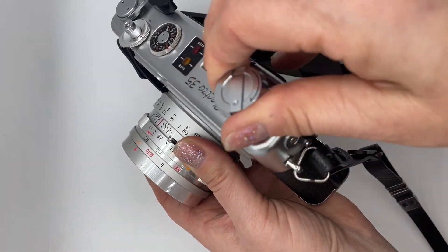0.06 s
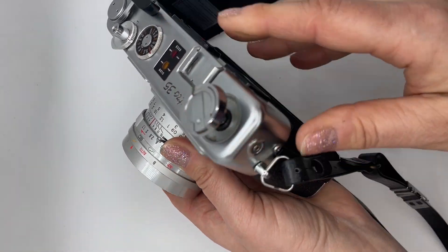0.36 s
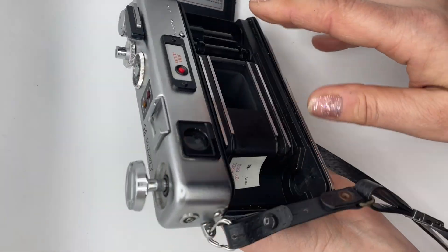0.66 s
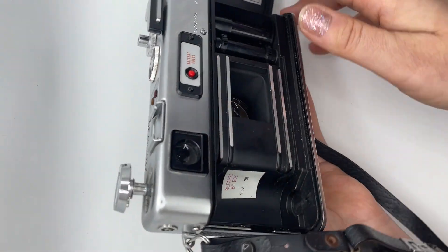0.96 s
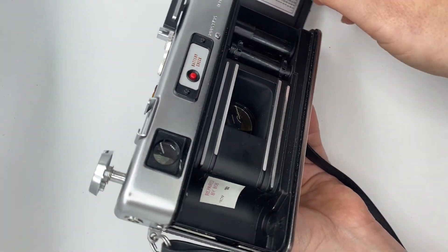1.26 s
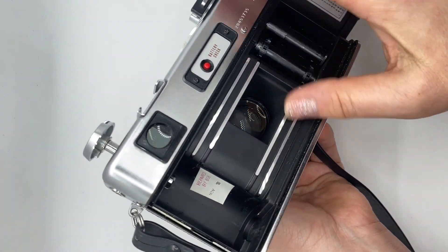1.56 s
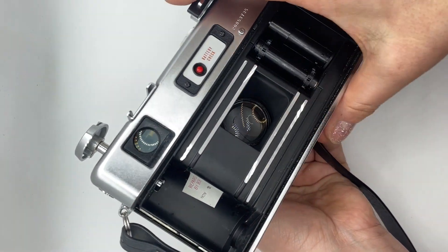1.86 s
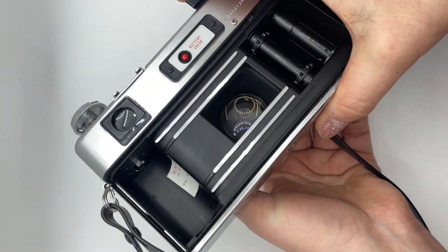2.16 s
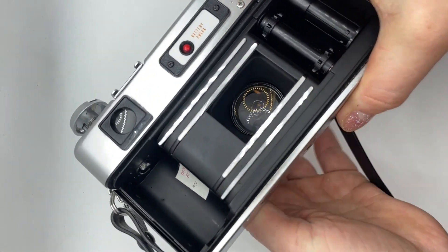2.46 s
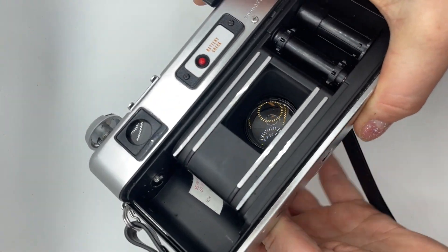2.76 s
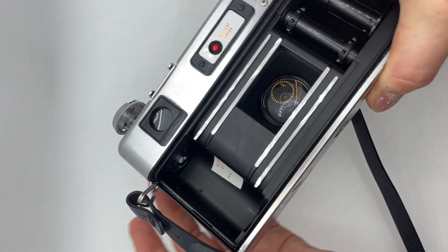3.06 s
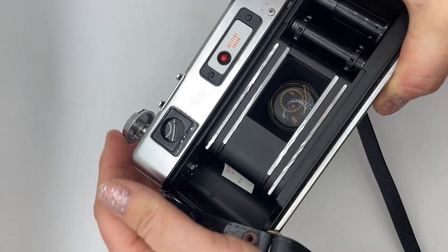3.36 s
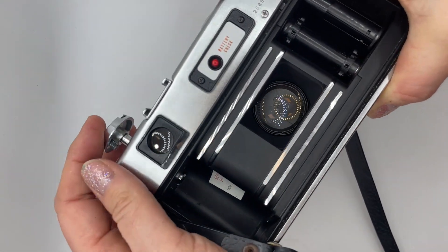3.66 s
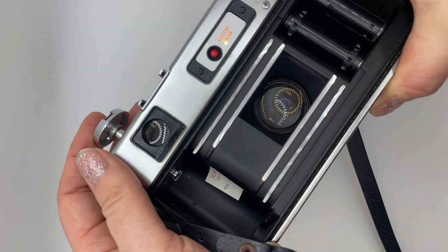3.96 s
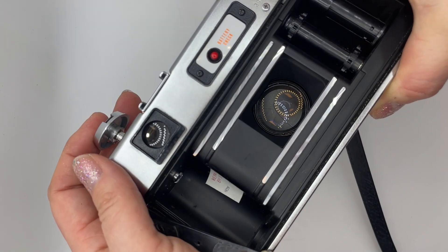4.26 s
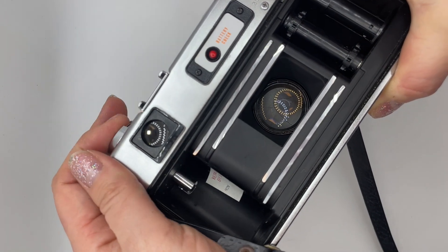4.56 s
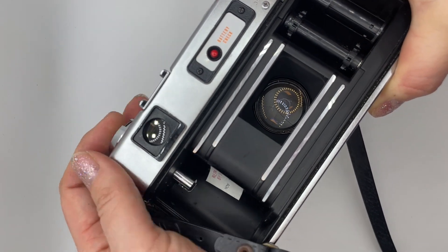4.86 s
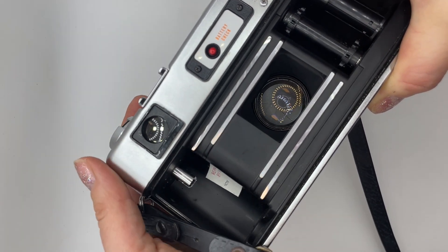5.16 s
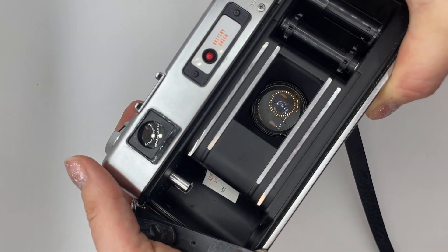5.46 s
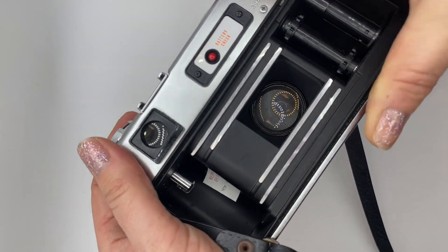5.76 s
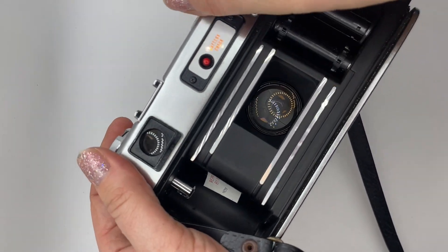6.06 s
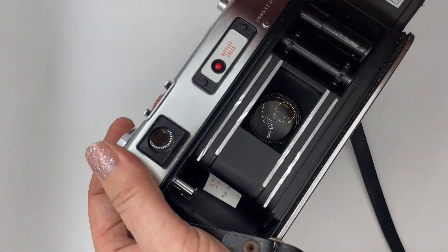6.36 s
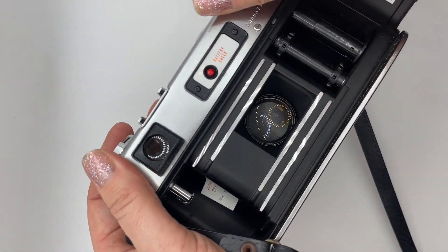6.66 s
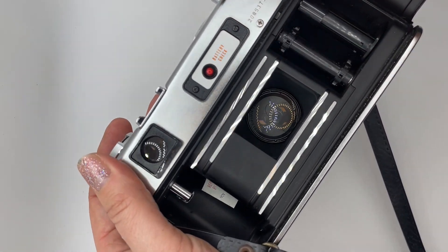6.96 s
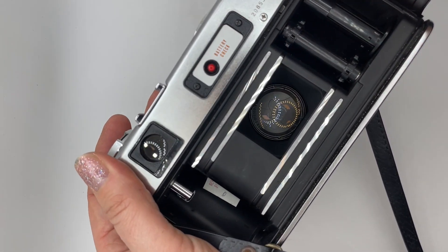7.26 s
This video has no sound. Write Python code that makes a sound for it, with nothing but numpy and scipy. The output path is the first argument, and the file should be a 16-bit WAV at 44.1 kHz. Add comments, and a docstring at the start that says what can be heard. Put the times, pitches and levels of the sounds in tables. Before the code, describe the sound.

Close clicks, knocks and soft finger rubbing as a metal film camera is handled and its back door springs open.

```python
"""Handling a metal film camera

In a small quiet room, close up and in stereo, the rewind knob is pulled up, the back door springs
open with a knock and a ringing spring, and the knob is snapped home. Each hit rings the thin shell
and hollow body, and the big ones thud in the hand. Fingers rub over the shell, the strap's ring
and buckle tick and jingle against it, and near the end the stiff hinge scrapes."""
import sys
import numpy as np
from scipy import signal
from scipy.fft import rfft, irfft, next_fast_len
from scipy.io import wavfile
from scipy.ndimage import map_coordinates

SR = 44100
rng = np.random.default_rng(int(sys.argv[2]) if len(sys.argv) > 2 else 0)


def dump(signal):
    """Clip the signal to [-1, 1] and save it as 16-bit WAV at the path in sys.argv[1]."""
    limited = np.clip(np.atleast_2d(signal).T, -1, 1)
    pcm = np.round(limited * 32767).astype(np.int16)
    wavfile.write(sys.argv[1], SR, pcm)


N = 326340
TIME = np.arange(N) / SR  # seconds since the start
AGE = np.arange(SR // 4) / SR  # seconds since a hit


def amp(db):
    """Turn decibels into a gain."""
    return 10 ** (np.asarray(db) / 20)


def unit(x):
    """Scale x to an average (rms) level of 1."""
    return x / np.sqrt(np.mean(x ** 2) + 1e-20)


def unit_hit(x):
    """Give x as much energy as ten milliseconds at level 1."""
    return x * np.sqrt(.01 * SR / (np.sum(x ** 2) + 1e-20))


def fade(ring_s):
    """Die away by 60 dB in ring_s seconds, the ring time."""
    return np.exp(-np.log(1000) * AGE / ring_s)


def along(points, hz):
    """Read a (frequency, value) table between its rows, on a log scale."""
    freqs, values = np.transpose(points)
    return np.interp(np.log(hz + 1), np.log(freqs + 1), values)


def curve(points):
    """Join (time, value) points into one value per sample."""
    return np.interp(TIME, *np.transpose(points))


def add(track, s, x):
    """Mix x into the track, starting at s seconds."""
    start = max(0, round(s * SR))
    track[start:start + len(x)] += x[:max(0, len(track) - start)]


def wobble(rate):
    """A smooth curve through `rate` random values a second."""
    return map_coordinates(rng.standard_normal(int(N * rate / SR) + 4), [TIME * rate])


def filtered(x, response):
    """Change the strength and phase of each frequency in x by response(hz)."""
    size = next_fast_len(N + SR // 2)
    return irfft(rfft(x, size) * response(np.fft.rfftfreq(size, 1 / SR)), size)[..., :N]


def resonate(x, modes):
    """Pass x through modes, the pitches at which a thing likes to ring; the result has level 1."""
    def response(f):
        return sum(amp(db) * 1j * f * width / (hz * hz - f * f + 1j * f * width)
                   for hz, width, db in modes)
    return unit(filtered(x, response))


def ring(modes, scatter_db, detune):
    """Struck metal rings in fading tones, a little different in strength and pitch each time."""
    chance = rng.standard_normal((len(modes), 3))
    tones = np.zeros(len(AGE))
    for (hz, db, ring_s), (louder, sharper, phase) in zip(modes, chance):
        cycles = hz * (1 + detune * sharper) * AGE + phase
        tones += amp(db + scatter_db * louder) * fade(ring_s) * np.sin(2 * np.pi * cycles)
    return unit_hit(tones * (1 - np.exp(-AGE / .0036)))


def chatter(click, hold_s, ring_s, tail_db, tail_s, rise_s=.0001):
    """Metal parts rattle in tiny uneven clicks for a moment, then die away with a faint tail."""
    burst = np.minimum(1, np.exp(-np.log(1000) * (AGE - hold_s) / ring_s))
    loudness = (1 - np.exp(-AGE / rise_s)) * (burst + amp(tail_db) * fade(tail_s))
    impacts = rng.standard_normal(len(AGE)) * amp(1.4 * rng.standard_normal(len(AGE)))
    return unit_hit(signal.fftconvolve(loudness * impacts, click)[:len(AGE)])


# The shell's broad resonances: (frequency [Hz], width [Hz], boost [dB])
SHELL_PEAKS = [(620, 250, 6.5), (890, 120, 4.5), (1120, 81, 2), (1750, 150, 3), (2100, 540, 5),
               (3430, 200, 2.5), (3860, 130, 1.5), (4900, 200, 0), (6540, 370, 3.5), (15500, 590, 6.5)]


def shell_db(hz):
    """How much the thin shell boosts each frequency."""
    return sum(db / (1 + (2 * (hz - centre) / width) ** 2) for centre, width, db in SHELL_PEAKS)


def shell_click(colour, size=4096):
    """One click of the given tone colour, heard through the shell."""
    hz = np.fft.rfftfreq(size, 1 / SR)
    cepstrum = irfft(np.log(amp(along(colour, hz) + shell_db(hz))))
    # Folding the second half onto the first packs the energy at the start (minimum phase).
    cepstrum[1:size // 2] *= 2
    cepstrum[size // 2 + 1:] = 0
    return irfft(np.exp(rfft(cepstrum)))


def through_shell(x, shifts_per_s=12, ring_s=.05):
    """Rubbing stirs the shell's many weak modes, which change as the finger moves."""
    hop = int(SR / shifts_per_s)
    window = signal.windows.cosine(2 * hop)
    padded = np.pad(x, (hop, 2 * hop))
    out = np.zeros(len(padded))
    for start in range(0, len(x) + hop, hop):
        answer = unit(rng.standard_normal(len(AGE)) * fade(ring_s)) / np.sqrt(len(AGE))
        answer[0] += 1  # the rubbing itself
        add(out, start / SR, signal.fftconvolve(window * padded[start:start + 2 * hop], answer))
    return out[hop:hop + len(x)] / np.sqrt(2)


# How alike left and right are in the room: (frequency [Hz], likeness [0 to 1])
STEREO_LIKENESS = [(100, 0.99), (290, 0.93), (640, 0.13), (3000, 0.068), (7000, 0.0067)]


def from_all_sides(pair):
    """Blend two unrelated signals so that left and right are alike only in the bass."""
    def shares(hz):
        angle = np.arccos(along(STEREO_LIKENESS, hz)) / 2
        return np.array([np.cos(angle), np.sin(angle)])
    mid, side = filtered(pair, shares)
    return np.array([mid + side, mid - side])


# The tones of springy steel: (frequency [Hz], level [dB], ring time [s])
STEEL_MODES = [(3700, -8, .035), (3914, -2.5, .04), (4210, 0, .06), (4420, -5, .03), (4740, -5, .03),
               (5100, -5, .03), (5400, -3, .04), (6510, 2, .04), (6640, -1, .045), (7030, -6, .04),
               (8870, -7, .05), (12760, -10, .05), (14140, -8, .05), (15570, -11, .05)]
# The bright edge of metal touching metal: (frequency [Hz], level [dB])
SPARKLE_COLOUR = [(2000, -32.5), (3500, -6), (5500, -3.5), (8000, -2), (9200, 3.5), (11500, -9),
                  (15300, -6.5), (16500, -18.5)]
# Hits on the springs and the strap ring: (time [s], level [dB])
JINGLE_HITS = [(0, -40), (0.6165, -25.5), (.635, -30), (.653, -37.5), (.672, -40), (.697, -46.5),
               (.722, -61), (1.003, -53), (1.165, -51.5), (1.551, -49), (1.595, -58.5), (1.66, -61),
               (1.72, -64.5), (1.9935, -58), (5.797, -51.5), (6.1, -75.5), (6.14, -74), (6.288, -55.5),
               (6.308, -58), (6.989, -69.5)]


def jingles(flight_s=.0082, bounce_loss_db=5.5, touches_per_s=260):
    """Steel hits its seat, rattles and bounces once; light hits ring shorter and less in tune."""
    out = np.zeros(N)
    sparkle = shell_click(SPARKLE_COLOUR)
    flights = flight_s * rng.uniform(.7, 1.2, len(JINGLE_HITS))
    for (hit_s, hit_db), flight in zip(JINGLE_HITS, flights):
        for s, db in [(hit_s, hit_db), (hit_s + flight, hit_db - bounce_loss_db)]:
            lightness = np.clip((-25 - db) / 25, 0, 1)
            touching = rng.random(len(AGE)) < touches_per_s / SR
            touches = touching * rng.standard_normal(len(AGE)) * fade(.03)
            touches[0] = 1.6  # the first strike
            modes = [(hz, level, ring_s * (1 - .3 * lightness)) for hz, level, ring_s in STEEL_MODES]
            tones = ring(modes, scatter_db=3 + 2 * lightness, detune=.014 + .016 * lightness)
            steel = unit_hit(signal.fftconvolve(touches, tones)[:len(AGE)])
            scrape = chatter(sparkle, hold_s=.002, ring_s=.03, tail_db=-26, tail_s=.1)
            add(out, s, amp(db) * (amp(-2.5) * steel + amp(-4.5) * scrape))
    return out


# The dull rub and the bright hiss of sliding, each: (frequency [Hz], level [dB])
RUB_COLOUR = [(250, -19), (450, -3.5), (620, -3.5), (780, -8), (920, 1.5), (1200, -5), (1500, -2.5),
              (2200, -5.5), (3200, -13), (6000, -38)]
HISS_COLOUR = [(1200, -27), (2500, -1), (4200, 4), (6000, 1.5), (7200, -0.5), (9000, -3), (11500, -15),
               (15300, -7), (16500, -26)]
# The hollow film chamber's resonances: (frequency [Hz], width [Hz], level [dB])
CHAMBER_MODES = [(647, 81, -6), (915, 44, -1.5), (1144, 61, 1), (1360, 37, -5), (1760, 90, -12),
                 (3035, 110, -12.5), (4150, 100, -17.5)]
# How strongly skin and strap slide: (time [s], level [dB])
SLIDE_LEVELS = [(0.0, -58.5), (0.25, -71), (0.39, -67.5), (0.5, -85.5), (0.68, -87), (0.76, -72.5),
                (1.0, -74.5), (1.06, -77), (1.12, -68.5), (1.52, -70), (1.7, -73.5), (1.8, -85.5),
                (2.0, -74), (2.43, -86), (2.82, -92.5), (3.05, -75), (3.42, -74), (3.85, -77.5),
                (3.98, -90), (4.3, -91), (4.74, -81.5), (4.95, -72), (5.12, -82.5), (5.4, -85.5),
                (5.83, -81.5), (7.05, -93), (7.4, -93.5)]


def sliding(snags_per_s=8):
    """Skin and strap stick and slip in fine grains, snag now and then, and stir the film chamber."""
    slide_db = curve(SLIDE_LEVELS)
    rub_db = -60.5 + .93 * (slide_db + 63)  # the rub swells a little less than the hiss
    pressure = wobble(23)
    snag_starts = (rng.random(N) < snags_per_s / SR) * rng.uniform(.72, 1, N)
    snags = np.abs(signal.fftconvolve(snag_starts, fade(.087))[:N])

    def friction(colour, grain_db, snag_db):
        slips = rng.standard_normal(N) * (amp(grain_db * wobble(540)) + amp(snag_db) * snags)
        return unit(filtered(through_shell(slips), lambda hz: amp(along(colour, hz) + shell_db(hz))))

    rub = amp(rub_db - 2 + 1.6 * pressure) * friction(RUB_COLOUR, grain_db=1.5, snag_db=6.5)
    hiss = amp(slide_db + .5 + 1.4 * pressure) * friction(HISS_COLOUR, grain_db=2.2, snag_db=6)
    chamber = amp(rub_db - 6.5 + 3 * wobble(14)) * resonate(rng.standard_normal(N), CHAMBER_MODES)
    return rub + chamber + hiss


# The deep tone of moving hands and arms: (frequency [Hz], level [dB])
RUMBLE_COLOUR = [(15, -43), (25, -13), (75, 1.5), (145, -3.5), (171, 4), (200, -6), (236, 2.5),
                 (264, -10.5), (339, -16.5), (442, -12), (501, -15.5), (617, -17), (700, -21.5), (910, -46),
                 (1540, -120)]
# How strongly the grip shifts: (time [s], level [dB])
GRIP_LEVELS = [(0.0, -56.5), (0.47, -57.5), (1.15, -56), (1.87, -60.5), (3.26, -56), (4.7, -61),
               (4.86, -62), (5.05, -71.5), (5.5, -68), (5.8, -69), (6.45, -66), (7.4, -73)]


def grip_rumble():
    """The shifting grip and moving arms make a low rumble, nearly the same left and right."""
    pair = filtered(rng.standard_normal((2, N)), lambda hz: amp(along(RUMBLE_COLOUR, hz)))
    return amp(curve(GRIP_LEVELS) + 1) * unit(from_all_sides(pair))


# The quiet room's background: (frequency [Hz], level [dB])
AIR_COLOUR = [(30, -8.5), (90, -5.5), (130, -2), (175, 6.5), (250, 1), (400, -1.5), (650, -4),
              (1100, -2.5), (2000, -17.5), (2600, -24), (8000, -33.5), (16000, -40.5)]


def room_air():
    """The room's own faint, steady noise comes from all around."""
    pair = filtered(rng.standard_normal((2, N)), lambda hz: amp(along(AIR_COLOUR, hz)))
    return amp(-72) * unit(from_all_sides(pair))


# Single strokes of a finger:
# (middle time [s], half length [s], level [dB], brightness [Hz], chamber level beside the stroke [dB])
FINGER_STROKES = [(0.017, 0.037, -56.5, 5170, -5), (0.324, 0.019, -61, 2080, 6),
                  (0.516, 0.012, -55.5, 490, -23.5), (0.767, 0.052, -63.5, 3640, 7),
                  (0.913, 0.056, -65.5, 3520, 3.5), (0.978, 0.021, -54.5, 3900, -3.5),
                  (1.117, 0.025, -55.5, 3700, -0.5), (1.161, 0.016, -50.5, 3870, -14),
                  (1.241, 0.021, -60, 4440, -14.5), (1.308, 0.029, -68, 960, -4),
                  (1.442, 0.058, -72, 3800, -4), (1.614, 0.097, -72, 5390, -17),
                  (1.825, 0.013, -78, 5000, -12), (2.329, 0.0076, -66, 6200, -13),
                  (2.37, 0.026, -73.5, 6040, -16), (2.423, 0.0022, -59.5, 3980, -16),
                  (2.491, 0.037, -62, 10700, -6.5), (2.609, 0.049, -70.5, 1603, 6),
                  (2.907, 0.037, -70.5, 2150, 11), (3.176, 0.036, -69, 2260, -11.5),
                  (3.305, 0.06, -68.5, 2080, -3), (3.48, 0.044, -70.5, 1470, -1),
                  (3.939, 0.0058, -77, 1727, 3), (4.151, 0.025, -69, 2640, -1),
                  (4.337, 0.0085, -70, 1000, -2.5), (4.359, 0.011, -70.5, 4460, -7),
                  (4.436, 0.005, -71.5, 4880, -8), (4.908, 0.016, -68, 5050, 2.5),
                  (4.998, 0.0075, -67, 7040, -5), (5.236, 0.03, -70.5, 4565, -4),
                  (5.993, 0.035, -78, 4190, -11), (6.282, 0.025, -59, 6000, -11),
                  (6.338, 0.014, -71.5, 710, 0.5), (6.398, 0.025, -67.5, 2640, -1),
                  (6.507, 0.022, -77.5, 2190, -11.5), (6.645, 0.016, -61.5, 2896, 3),
                  (7.073, 0.044, -73.5, 4430, 0.5), (7.263, 0.022, -73, 1880, 4),
                  (7.351, 0.027, -77, 3280, -11)]


def finger_strokes(band_octaves=.91):
    """A fingertip drags over the shell in a swell of tiny slips that also hums in the film chamber."""
    rubbing, chamber_gain = np.zeros(N), np.zeros(N)
    hz = np.fft.rfftfreq(2048, 1 / SR)
    slips = unit(rng.standard_normal(N) * amp(2.2 * (wobble(540) + wobble(90))))
    for s, half_s, db, centre_hz, chamber_db in FINGER_STROKES:
        near = np.abs(TIME - s) < 3 * half_s
        swell = amp(db) * np.exp(-.5 * np.abs((TIME[near] - s) / half_s) ** 3)
        band = amp(shell_db(hz)) / (1 + (np.log2((hz + 1) / centre_hz) / band_octaves) ** 4)
        one_slip = np.fft.fftshift(irfft(band))
        drag = signal.fftconvolve(slips[near], one_slip / np.linalg.norm(one_slip), "same")
        rubbing[near] += swell * through_shell(drag)
        chamber_gain[near] += amp(chamber_db) * swell
    return rubbing + chamber_gain * resonate(slips, CHAMBER_MODES)


# The tones of the hollow body and its shell: (frequency [Hz], level [dB], ring time [s])
BODY_MODES = [(660, 0.5, .05), (730, -6, .04), (895, 1, .05), (1030, -2, .025), (1170, 1.5, .028),
              (1355, 0, .07), (1530, -3, .03), (1670, -1, .025), (1825, 0.5, .04), (2130, 1, .03),
              (2404, 2, .035), (2760, -2.5, .03), (3220, -.5, .035), (3480, 1, .025), (3850, 0, .025),
              (4130, -3, .025), (4650, -3, .02), (5000, -1, .025), (5290, -1, .03), (5930, -3, .025),
              (6520, 0, .025), (6790, -0.5, .02), (7350, -4, .02), (7860, 2, .02), (8180, 1, .018),
              (9200, 0, .018)]


def body_ring(centre_hz, octaves, scatter_db, detune):
    """The camera rings most strongly near centre_hz, which depends on where it is hit."""
    modes = []
    for hz, db, ring_s in BODY_MODES:
        distance = abs(np.log2(hz / centre_hz))
        loss_db = 24 - 24 / (1 + (distance / octaves) ** 2) + 4 * distance
        modes.append((hz, db - loss_db, ring_s))
    return ring(modes, scatter_db, detune)


# The shell's sharp crack and the body's hollow knock, each: (frequency [Hz], level [dB])
CRACK_COLOUR = [(700, -41.5), (1200, -15.5), (1600, -2), (2500, -2), (4500, 0), (6000, 0), (9000, -22),
                (16000, -44.5)]
KNOCK_COLOUR = [(120, -27), (300, -8), (450, -11), (650, -11), (950, 1), (1400, -7.5), (1900, -19),
                (4000, -57)]


def strike(out, s, body_db, crack_db, sparkle_db, top_db, ring_db, body_hz, shell_hz):
    """Add one metal hit: it sparkles and cracks at once, and the hollow body knocks just after."""
    firm_db, top_hz = -42.5, 10500
    rise_s = .00061 / (1 + amp(max(crack_db, sparkle_db) - firm_db))  # light hits start more softly
    life = amp(ring_db / 3)  # a damped hit also dies sooner

    bright = shell_click([(hz, db + top_db * (hz > top_hz)) for hz, db in SPARKLE_COLOUR])
    sparkle = chatter(bright, hold_s=.001, ring_s=.019 * life, tail_db=-46, tail_s=.05, rise_s=rise_s)
    add(out, s, amp(sparkle_db) * sparkle)

    sharp = shell_click(CRACK_COLOUR)
    crack = chatter(sharp, hold_s=.004, ring_s=.03 * life, tail_db=-32, tail_s=.1, rise_s=rise_s)
    shell_tones = body_ring(shell_hz, octaves=.22, scatter_db=4, detune=.03)
    add(out, s, amp(crack_db) * unit_hit(amp(-2) * crack + amp(ring_db - 4) * shell_tones))

    hollow = shell_click(KNOCK_COLOUR)
    knock = chatter(hollow, hold_s=.0048, ring_s=.036 * life, tail_db=-29, tail_s=.2, rise_s=rise_s)
    body_tones = body_ring(body_hz, octaves=.3, scatter_db=2.5, detune=.025)
    body = unit_hit(amp(-5.5) * knock + amp(ring_db - 3.5) * body_tones)
    add(out, s + .0023, amp(body_db - 2.54) * body)


def tap(out, s, db, hardness_db, top_db, body_hz, shell_hz):
    """Add one tap: the harder the contact, the more sparkle and the less body."""
    strike(out, s, body_db=db - hardness_db - 2, crack_db=db, sparkle_db=db + hardness_db - 4,
           top_db=top_db, ring_db=0, body_hz=body_hz, shell_hz=shell_hz)


# The catches, in order: knob pulled up, door springs open, knob pushed home, door nudged, door stops.
# (time [s], body [dB], crack [dB], sparkle [dB], top treble [dB], ring [dB], body pitch [Hz],
#  shell pitch [Hz], tick lead [s], tick level [dB]); ring is low where the hand damps it
CATCH_SNAPS = [(0.1382, -52, -39.5, -17, 6.5, 0, 787, 7500, 0.015, -53.5),
               (0.5929, -19, -27.5, -43.5, -1, -2, 591, 1790, 0.014, -36.5),
               (4.546, -24, -20, -20.5, 3, -7.5, 999, 5000, .0118, -35.5),
               (6.224, -42.5, -37, -37.5, -2, 12, 938, 5900, 0.0083, -53.5),
               (6.6558, -34, -34, -29.5, -8, 7, 895, 7700, 0.017, -54)]


def catches():
    """Each spring-loaded catch ticks as it slips, then snaps."""
    out = np.zeros(N)
    for s, *snap, lead_s, tick_db in CATCH_SNAPS:
        strike(out, s, *snap)
        tap(out, s - lead_s, tick_db, hardness_db=0, top_db=0, body_hz=1250, shell_hz=2830)
    return out


# Small hits on the camera:
# (time [s], level [dB], hardness [dB], top treble [dB], body pitch [Hz], shell pitch [Hz])
SMALL_TAPS = [(0.1388, -29.5, -1.5, -11, 884, 4140), (0.1428, -33.5, -0.5, 0, 750, 4100),
              (0.1735, -45, -8, -4.5, 720, 1540), (0.393, -52.5, -7.5, -0.5, 1130, 2220),
              (0.586, -38.5, -7, -2, 1250, 4880), (1.028, -67, -17, 0, 620, 8700),
              (1.166, -55.5, -2, -6, 800, 4780), (1.278, -61, -14, -3, 1080, 1940),
              (1.342, -48, 1, -2.5, 786, 5200), (1.528, -66.5, 17, -2, 661, 5370),
              (1.9935, -53, 7.5, -2, 1460, 4800), (2.0054, -46.5, -8.5, -5, 1031, 3450),
              (2.039, -63.5, 6, -2, 978, 3470), (2.086, -59, 1, 4, 888, 3470),
              (2.1063, -52.5, 8, 1, 1150, 6870), (2.451, -68.5, 6, 1, 1100, 8940),
              (2.7273, -63, -16.5, 2, 895, 1965), (2.867, -64, -0.5, 2, 1390, 8600),
              (2.9268, -34, -0.5, -3, 895, 2610), (2.949, -49, 2, 0, 1500, 4680),
              (2.9753, -49.5, 1.5, -1, 1020, 3530), (2.992, -59, 11, -3, 1406, 7000),
              (3.009, -62, 13, -5, 610, 2400), (3.0461, -34.5, 10, 4, 1400, 9600),
              (3.06, -43, 2, -2, 1110, 2390), (3.074, -41.5, 0, -2, 800, 2240),
              (3.094, -61, -9.5, -7, 1085, 2250), (3.108, -59, -6, -7, 1000, 2150),
              (3.211, -60, -6, -7, 1150, 2073), (3.272, -67, 15, 7, 877, 2050),
              (3.346, -60, 3.5, 1, 1054, 2744), (3.39, -76, 19, -5, 893, 8000),
              (3.406, -53.5, 4.5, -9, 605, 9300), (3.446, -59, -7.5, -7, 1067, 1730),
              (3.4816, -54, 10, 3.5, 628, 8940), (3.54, -64.5, -6, -1, 1095, 2280),
              (3.6079, -50.5, 0.5, 0, 960, 2390), (3.765, -74.5, 5, -2.5, 880, 7270),
              (3.783, -69, 14.5, -7, 593, 8000), (3.82, -67.5, 22, 3, 853, 8400),
              (4.024, -68, 2, -4.5, 1107, 3420), (4.0407, -54, 9.5, -7, 988, 8430),
              (4.146, -62.5, -10.5, -5, 688, 2657), (4.165, -70, -1.5, -3, 1174, 2410),
              (4.344, -66.5, -25.5, 0.5, 996, 1633), (4.436, -68.5, -9.5, 0.5, 883, 2070),
              (4.496, -62, 1, 0, 896, 3500), (4.509, -56.5, 6.5, 10, 880, 8140),
              (4.5502, -29, 1, -3, 1163, 1793), (4.8482, -57, -8.5, -5, 943, 1660),
              (4.871, -63, 10.5, -8, 858, 5990), (5.0021, -57, 6, 3, 1066, 8400),
              (5.14, -51.5, -8, -9.5, 1540, 2122), (5.149, -56, -7, -4, 900, 2110),
              (5.468, -68, 8, 0, 1114, 3180), (5.4887, -64, -3, 1, 898, 4700),
              (5.517, -67.5, -1, -3, 900, 6800), (5.6444, -43.5, 1, -1.5, 1574, 1620),
              (5.7105, -63, -10, 2, 1390, 6520), (5.7812, -52, 7.5, 3, 637, 4460),
              (5.884, -61.5, -6.5, 2, 906, 2300), (6.176, -60, -4, 1, 1006, 5340),
              (6.237, -45, -1.5, 2, 956, 6040), (6.2538, -49, -3, -5, 1370, 1580),
              (6.333, -59.5, -2.5, 2, 609.6, 6830), (6.6575, -58, -17.5, 0, 1351, 5260),
              (7.273, -63.5, 7.5, 2.5, 1167, 8520)]


def taps():
    """Strap ring, buckle, fingernails and loose parts tick against the shell; a few taps are the rewind knob
    landing a second time as it snaps."""
    out = np.zeros(N)
    for row in SMALL_TAPS:
        tap(out, *row)
    return out


# Dull bumps against the hand:
# (time [s], level [dB], first pitch [Hz], settled pitch [Hz], ring time [s])
HAND_THUDS = [(0.142, -31, 260, 75, 0.035), (0.172, -40, 229, 49, 0.26), (0.595, -17.5, 285, 54, 0.24),
              (0.607, -31, 268, 150, 0.097), (0.632, -36, 280, 235, 0.076),
              (1.028, -42, 198.1, 160.8, 0.041), (2.73, -39.5, 224, 185.6, 0.13),
              (2.773, -44.5, 99.6, 85, 0.26), (3.072, -35.5, 238.5, 165, 0.032),
              (3.217, -41, 240, 216, 0.12), (4.5492, -23, 300, 118, 0.018), (4.553, -25, 100, 50, 0.072)]


def thuds(clunk_hz=380, settle_s=.0105):
    """The camera's weight clunks into the hand, which gives way, so the bump drops in pitch and dies."""
    out = np.zeros(N)
    clunk = amp(-5.5) * fade(.026) * np.sin(2 * np.pi * clunk_hz * AGE)
    onset = 1 - np.exp(-AGE / .0001)
    for s, db, first_hz, settled_hz, ring_s in HAND_THUDS:
        hz = settled_hz + (first_hz - settled_hz) * np.exp(-AGE / settle_s)
        bump = fade(ring_s) * np.sin(2 * np.pi * np.cumsum(hz) / SR)
        add(out, s, amp(db) * onset * (clunk + bump))
    return out


# Resonances of the camera held in the palm: (frequency [Hz], width [Hz], level [dB])
HELD_MODES = [(115, 40, -5.5), (180, 40, 1.5), (234, 19, -4.5)]
# Soft pushes of the palm: (middle time [s], half length [s], level [dB])
PALM_SHOVES = [(2.627, 0.037, -60), (2.747, 0.022, -58), (2.938, 0.021, -54), (3.241, 0.021, -54),
               (4.426, 0.023, -57.5), (4.844, 0.028, -62.5), (5.728, 0.053, -62.5), (6.106, 0.039, -68.5),
               (6.371, 0.041, -60.5), (7.071, 0.022, -68)]


def palm_shoves():
    """The palm shifts its hold and the camera's weight answers with a soft, low swell."""
    swell = sum(amp(db) * np.exp(-.5 * ((TIME - s) / half_s) ** 2) for s, half_s, db in PALM_SHOVES)
    return swell * resonate(rng.standard_normal(N), HELD_MODES)


# The door plate's resonances: (frequency [Hz], width [Hz], level [dB])
DOOR_MODES = [(1362, 22, 6.5), (2200, 52, -1.5), (2970, 43, -3), (3710, 110, -10), (4290, 55, -8.5),
              (5260, 74, -5), (6330, 80, -4)]


def hinge(start_s=5.7, rise_s=.042, easing_db_per_s=108):
    """The stiff hinge sticks and slips, making the door plate sing, then runs free."""
    age = TIME - start_s
    binding = np.clip(age / rise_s, 0, 1) * amp(-55 - easing_db_per_s * np.maximum(0, age - rise_s))
    slips = rng.standard_normal(N) * amp(4.2 * wobble(250))
    singing = resonate(slips, DOOR_MODES)
    hiss = unit(filtered(slips, lambda hz: amp(along(HISS_COLOUR, hz))))
    return binding * (amp(-2.5) * singing + amp(-16) * hiss)


# How long the room rings: (frequency [Hz], ring time [s])
ROOM_RING_TIMES = [(100, .45), (500, .6), (2000, .48), (5000, .33), (8000, .18), (9800, .06), (15000, .06)]


def room_echo(x):
    """The walls throw the sound back, each frequency dying at its own speed."""
    hz, t, noise = signal.stft(rng.standard_normal((2, SR)), SR, nperseg=256)
    decay = amp(-60 * t / along(ROOM_RING_TIMES, hz)[:, None])
    _, tail = signal.istft(noise * decay, SR, nperseg=256)
    tail *= 1 - np.exp(-np.arange(tail.shape[1]) / SR / .00084)  # soft start
    tail /= np.linalg.norm(tail[0])
    return from_all_sides(signal.fftconvolve(x[None], tail, axes=1)[:, :N])


# How far the right channel runs ahead of the left: (frequency [Hz], phase lead [rad])
RIGHT_LEAD = [(100, .16), (300, .36), (1500, .37), (2700, .55), (3500, .9), (4800, .9), (6300, 1.8),
              (8000, 1.7), (9600, 2.9), (11500, 3.1), (13000, 4), (15500, 4.4)]


def scene():
    """All the camera's sounds in the room, reaching the right side just before the left."""
    camera = catches() + taps() + thuds() + palm_shoves() + jingles() + hinge()
    camera += finger_strokes() + sliding()
    sides = np.array([[-1], [1]])  # left, right
    direct = filtered(camera, lambda hz: np.exp(.5j * along(RIGHT_LEAD, hz) * sides))
    echo = amp(-24) * room_echo(camera)
    balance = amp(-.2 * sides)  # the left is a touch louder
    return (direct + grip_rumble()) * balance + echo + room_air()


def record(dry):
    """Cut away the deepest bass and the very highest treble."""
    low_hz, high_hz = 46, 16500
    lean = signal.sosfilt(signal.butter(2, low_hz, "highpass", fs=SR, output="sos"), dry)
    return filtered(lean, lambda hz: 1 / np.sqrt(1 + (hz / high_hz) ** 160))


dry = scene()
out = record(dry)
dump(out)
```